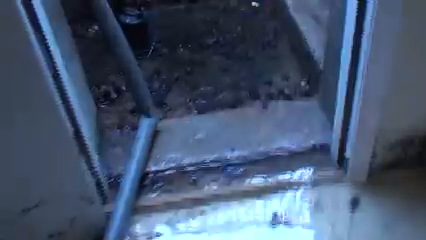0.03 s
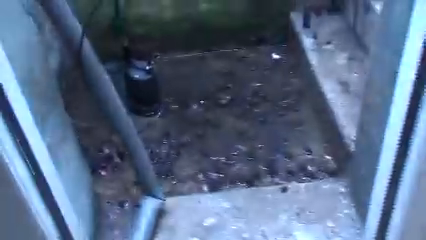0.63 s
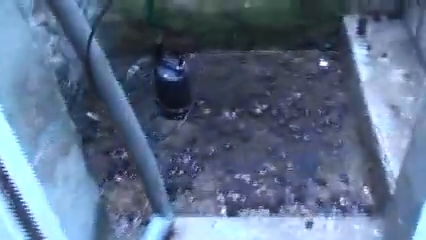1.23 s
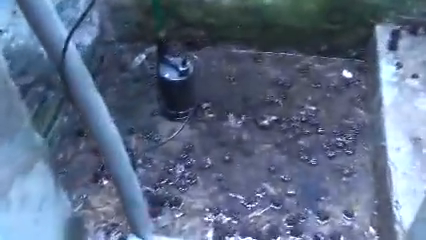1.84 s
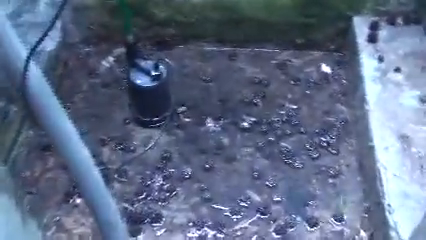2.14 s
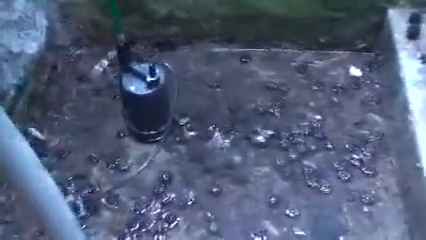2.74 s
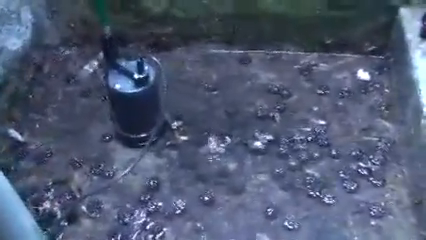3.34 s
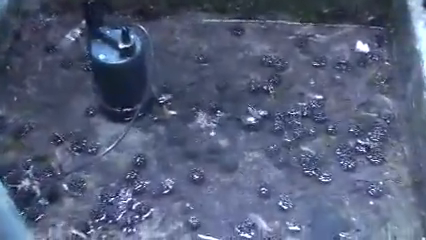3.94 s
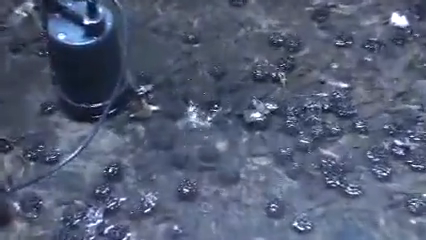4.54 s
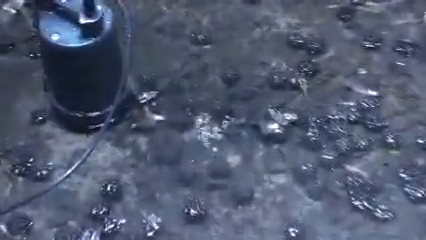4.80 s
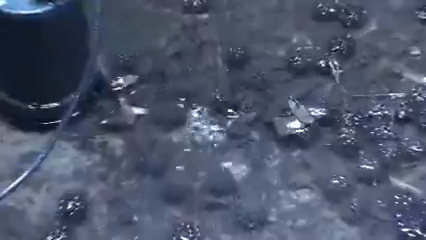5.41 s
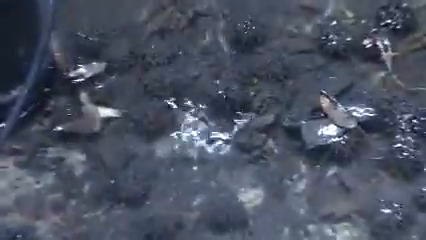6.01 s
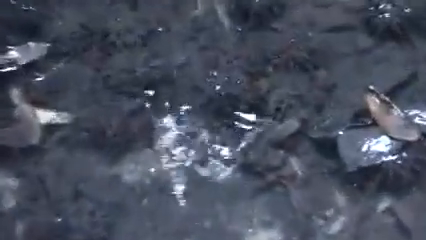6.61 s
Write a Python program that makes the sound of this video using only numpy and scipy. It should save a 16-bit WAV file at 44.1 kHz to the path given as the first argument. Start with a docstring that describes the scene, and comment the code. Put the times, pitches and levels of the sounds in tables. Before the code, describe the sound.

Water gurgles and splashes in uneven surges from a backed-up drain, over trickling and a low pump hum.

```python
"""A backed-up basement drain

Water wells up in uneven surges at a drain in a flooded concrete well. Each surge frees bubbles that
gulp and gurgle, and throws droplets and spray. Hard walls echo; water trickles and plops in between.
A pump hums and rumbles under the water, louder as the listener comes through the doorway."""
import sys
import numpy as np
from scipy import signal
from scipy.fft import rfft, irfft, next_fast_len
from scipy.io import wavfile
from scipy.ndimage import map_coordinates

SR = 44100
rng = np.random.default_rng(int(sys.argv[2]) if len(sys.argv) > 2 else 0)


def unload_audio(sound):
    """Save the sound as a 16-bit wav file, at the path given as the first command line argument."""
    columns = np.transpose(np.atleast_2d(sound))
    # keep every value between -1 and 1, then stretch to whole-number steps
    steps = np.round(np.clip(columns, -1, 1) * 32767)
    wavfile.write(sys.argv[1], SR, steps.astype(np.int16))


N = 293706


def amp(db):
    """Turn decibels into a gain."""
    return 10 ** (np.asarray(db) / 20)

def unit(x):
    """Scale a sound to an average power of 1."""
    return x / np.sqrt(np.mean(x ** 2) + 1e-20)

def add(out, start_s, sound):
    """Mix a sound into a track."""
    part = out[int(start_s * SR):][:len(sound)]
    part += sound[:len(part)]

def along(table, hz):
    """Read between the rows of a table of frequencies and values."""
    freqs, values = np.transpose(table)
    return np.interp(np.log(hz + 1), np.log(freqs), values)

def wobble(rate):
    """A smooth random curve through `rate` points a second."""
    return map_coordinates(rng.standard_normal(int(N * rate / SR) + 4), [np.arange(N) * rate / SR])

def filtered(x, response):
    """Give each frequency the gain response(hz)."""
    size = x.shape[-1]
    padded = next_fast_len(size + 4096)
    return irfft(rfft(x, padded) * response(np.fft.rfftfreq(padded, 1 / SR)), padded)[..., :size]

def coloured(x, tone):
    """Shape the lows and highs with a tone table, at power 1."""
    return unit(filtered(x, lambda hz: amp(along(tone, hz))))

def swell(t, rise_s, hold_s, fade_s):
    """Build up, stay until time hold_s, then drop 60 dB every fade_s."""
    return np.clip(t / max(rise_s, .003), 0, 1) * amp(-60 * np.maximum(t - hold_s, 0) / fade_s)

def bubbles(size, rate, hz, spread, cycles, scatter_db, glide=0.093):
    """Bubbles, `rate` a second: each rings, fades over `cycles` and rises in pitch near the surface."""
    chance = rng.random((max(int(rate * size / SR), 4), 4))
    start = (chance[:, 0] * size).astype(int)
    pitch = np.broadcast_to(hz, size)[start, None] * np.exp(spread * (2 * chance[:, 1:2] - 1))
    strength = amp(-scatter_db * np.log(1 - .97 * chance[:, 2:3]))
    samples = np.arange(int(min(4 * cycles / np.min(hz), .06) * SR) + 8)
    turns = pitch * samples / SR
    age = turns / cycles
    tone = np.sin(2 * np.pi * turns * (1 + glide * age / 2)) * np.exp(-age) * np.sqrt(pitch)
    tone *= strength * np.sign(chance[:, 3:] - .5)
    return unit(np.bincount((start[:, None] + samples).ravel(), tone.ravel(), size)[:size])


# How long the concrete echoes: frequency_hz, fade_s
ECHO_FADES = [(150, 0.45), (500, 0.72), (1100, 0.93), (1550, 0.86), (2200, 1), (4000, 0.75), (11000, 0.51)]

def walls(x):
    """Hard walls give a blurred echo; each frequency dies at its own speed."""
    hz, t, noise = signal.stft(rng.standard_normal(SR), SR, nperseg=256)
    tail = signal.istft(noise * amp(-60 * t / along(ECHO_FADES, hz)[:, None]), SR, nperseg=256)[1]
    return signal.fftconvolve(x, np.pad(tail / np.linalg.norm(tail), (SR // 150, 0)))[:N]


# Stereo width by frequency: frequency_hz, level_db
STEREO_WIDTH = [(50, -18), (130, -20), (300, -11.5), (1200, -7), (2200, -7), (3600, -13), (4400, -70)]
# How much louder the left is than the right: frequency_hz, level_db
LEFT_BOOST = [(40, .5), (200, 1.6), (1000, 1.2), (2200, 1), (4000, 0)]

def stereo(x, fade_s=0.16):
    """Left and right differ mostly at middle pitches; the treble is the same in both."""
    t = np.arange(SR // 4) / SR
    blur = rng.standard_normal(len(t)) * amp(-60 * t / fade_s) * (t > .004)
    side = signal.fftconvolve(x, blur / np.linalg.norm(blur))[:N]
    side = filtered(side, lambda hz: amp(along(STEREO_WIDTH, hz)))
    pair = np.array([x + side, x - side])
    return filtered(pair, lambda hz: amp(np.outer([.5, -.5], along(LEFT_BOOST, hz))))


# The way in through the doorway: time_s, nearness
WALK = [(1.2, 0.14), (3.0, 0.77), (6.4, 0.98)]

def nearness():
    """How close the listener is, from 0 (outside) to 1 (at the drain)."""
    return np.interp(np.arange(N) / SR, *np.transpose(WALK))


# The pump's low rumble: frequency_hz, level_db
RUMBLE_TONE = [(15, -54), (25, -37), (36, -13), (52, 4), (68, 5), (90, -9), (135, 2), (170, -1), (300, -30)]

def pump(shaft_hz=57.65, whine_hz=410):
    """The motor hums at two and three times its shaft speed, with a faint whine and a rumble."""
    near = nearness()
    hum_db, rumble_db = -63 + 21 * near, -63.5 + 17.5 * near
    shaft = 2 * np.pi * np.cumsum(shaft_hz + 0.23 * wobble(7.1)) / SR
    hum = amp(hum_db + 0.89 * wobble(9))
    hum *= unit(np.sin(2 * shaft) + amp(-7 + 2.8 * wobble(12)) * np.sin(3 * shaft))
    whine = amp(hum_db - 8.5 + 3 * wobble(2.8))
    whine *= unit(np.sin(2 * np.pi * np.cumsum(whine_hz + 5 * wobble(25)) / SR))
    return hum + whine + amp(rumble_db) * coloured(rng.standard_normal(N), RUMBLE_TONE)


# The wash of running water and its fizz: frequency_hz, level_db
WASH_TONE = [(90, -20), (180, 0.5), (420, 2), (850, -1), (1350, 2.5), (2100, -3.5), (2600, -2.5),
             (3400, -8), (6500, -10), (12000, -23)]
FIZZ_TONE = [(2000, -23), (3500, -8.5), (5000, -3), (7300, -0.5), (9500, -4), (11500, -2.5), (12300, -5)]

def trickle():
    """Water keeps running: bubbles on a soft wash, and a fizz that grows as the listener nears."""
    near = nearness()
    flow = amp(0.26 * wobble(4.5))
    babble = bubbles(N, rate=260, hz=793, spread=1.2, cycles=6.4, scatter_db=5.5, glide=0.037)
    wash = coloured(rng.standard_normal(N), WASH_TONE) * amp(1.75 * wobble(14))
    stream = amp(-37.5 + 1.27 * near) * (wash + amp(-9) * babble)
    fizz = bubbles(N, rate=7000, hz=6500, spread=0.68, cycles=1.06, scatter_db=0)
    return flow * (stream + amp(-48.5 + 7 * near ** 2) * coloured(fizz, FIZZ_TONE))


# The notes of one hollow knock: pitch_hz, level_db, fade_s
KNOCK_NOTES = [(215, -21.5, 0.12), (2136, -21, 0.091)]

def knock(start_s=.268):
    """A hollow knock rings briefly under a bright, splashy clash."""
    out, t = np.zeros(N), np.arange(SR // 3) / SR
    onset = 1 - np.exp(-t / 0.0065)
    for hz, db, fade_s in KNOCK_NOTES:
        add(out, start_s, amp(db - 60 * t / fade_s) * onset * np.sin(2 * np.pi * hz * t))
    clash = bubbles(len(t), rate=1600, hz=7030, spread=0.13, cycles=40, scatter_db=5, glide=.003)
    crack = bubbles(len(t), rate=6000, hz=3850, spread=0.88, cycles=2.5, scatter_db=1.5)
    add(out, start_s, amp(-27.5) * swell(t, .004, 0.024, fade_s=0.24) * clash)
    add(out, start_s, amp(-27) * swell(t, 0.0038, 0.025, fade_s=0.19) * crack)
    return out


# The loudest plops: start_s, level_db, pitch_hz, splat_db (added to level_db)
WATER_PLOPS = [(0.8, -25, 2490, -11), (1.434, -21.5, 733, -10), (1.553, -27.5, 530, -11),
               (1.826, -20, 1325, -14), (2.22, -26, 2730, -3), (3.128, -21, 1486, -23),
               (3.224, -26.5, 676, -36), (3.477, -35.5, 1360, 3), (4.391, -26, 506, -3.5),
               (4.737, -26.5, 1213, -8.5), (5.405, -27, 2520, 1.5), (5.431, -21.5, 1265, -14),
               (5.614, -27.5, 2500, -1.5)]

def plops():
    """Lumps of water slap the surface, each ringing one bubble; small drips fall at random."""
    out, t = np.zeros(N), np.arange(SR // 8) / SR
    for start_s, db, hz, splat_db in WATER_PLOPS:
        ring = np.sin(2 * np.pi * hz * t * (1 + 1.2 * t))
        ring *= amp(-60 * t / 0.052) * np.minimum(t / 0.0016, 1)
        splat = bubbles(len(t), rate=2500, hz=1725, spread=0.77, cycles=2.34, scatter_db=2)
        splat *= swell(t, 0.0062, 0.0078, fade_s=0.06)
        add(out, start_s, amp(db) * (ring + amp(splat_db + 2) * splat))
    drips = bubbles(N, rate=30, hz=1464, spread=0.85, cycles=3.7, scatter_db=1.5, glide=0.018)
    return out + amp(-47.5) * drips


# Surges of air and water, which drive splash, bubble_notes and gurgle:
# start_s, rise_s, hold_s, gurgle_db, gulp_db, spray_db
DRAIN_SURGES = [(0.131, 0.017, 0.021, -34.5, -38, -39), (0.411, 0.013, 0.025, -38, -33.5, -49),
                (0.655, 0.015, 0.28, -44.5, -40.5, -46.5), (0.823, 0.024, 0.1, -27.5, -31, -41.5),
                (0.966, 0.013, .055, -37.5, -41, -40), (1.351, 0.018, .064, -47, -49, -52),
                (1.619, 0.0075, 0.063, -29.5, -31.5, -37.5), (1.777, 0.048, 0.21, -35, -38, -40.5),
                (1.95, 0.018, 0.098, -26, -30.5, -33), (2.617, 0.038, 0.093, -44, -40, -47.5),
                (2.718, 0.01, 0.073, -29, -37, -39.5), (2.989, 0.012, 0.098, -28.5, -37.5, -44),
                (3.368, 0.024, .09, -46, -40, -57), (3.563, 0.023, 0.097, -25, -32.5, -34),
                (4.137, 0.0087, 0.1, -25.5, -30, -40.5), (4.911, .012, 0.077, -24, -30.5, -35.5),
                (5.347, .014, 0.04, -38, -34, -41.5), (5.874, 0.021, 0.081, -20, -31, -26.5),
                (6.237, 0.014, 0.055, -40, -43, -42), (6.348, 0.0073, 0.06, -28.5, -31.5, -32.5),
                (6.398, 0.026, 0.071, -23.5, -31, -29.5)]
USUAL_GURGLE_DB, USUAL_SPRAY_DB, USUAL_RISE_S = -27, -36, .015  # an ordinary surge
# The three parts of a splash: frequency_hz, level_db
GULP_TONE = [(25, -60), (90, -31), (170, -13.5), (300, -4), (420, -1), (620, 1.5), (770, 3.5), (900, -11.5),
             (1500, -38)]
DROP_TONE = [(1000, -36), (2000, 4), (2500, -1), (3200, -2.5), (4300, -1.5), (6000, -25)]
SPRAY_TONE = [(2500, -20), (4000, -5.5), (4700, -1), (6200, -3), (7600, -3), (9200, -7.5), (12000, -9.5)]

def splash(spray_lag_s=0.0023):
    """Surges push out deep gulps of air, droplets and spray; a softer backwash follows as water falls."""
    gulp_power, drop_power, spray_power = np.zeros((3, N))
    t = np.arange(SR) / SR
    backwash = amp(-17.5) * swell(t - 0.19, rise_s=0.099, hold_s=0.24, fade_s=0.45)
    for start_s, rise_s, hold_s, _, gulp_db, spray_db in DRAIN_SURGES:
        push = swell(t, rise_s, hold_s, fade_s=0.39)
        burst = swell(t, rise_s + spray_lag_s, hold_s, fade_s=0.44)
        drop_db = -35.8 + .65 * (spray_db - USUAL_SPRAY_DB)
        add(gulp_power, start_s, (amp(gulp_db + 0.1) * (push + backwash)) ** 2)
        add(drop_power, start_s, (amp(drop_db) * (burst + backwash)) ** 2)
        add(spray_power, start_s, (amp(spray_db + 1.72) * (burst + amp(-4) * backwash)) ** 2)
    gulps = bubbles(N, rate=700, hz=402.7, spread=0.89, cycles=3.67, scatter_db=1)
    drops = bubbles(N, rate=1900, hz=3160, spread=0.534, cycles=2.3, scatter_db=6.5)
    spray = bubbles(N, rate=5000, hz=7310, spread=0.563, cycles=2.95, scatter_db=3)
    return (np.sqrt(gulp_power) * coloured(gulps, GULP_TONE)
            + np.sqrt(drop_power) * coloured(drops, DROP_TONE)
            + np.sqrt(spray_power) * coloured(spray, SPRAY_TONE))

def bubble_note(rise_s, hold_s, hz, spread):
    """A steady neck of air pinches off bubbles of like size, so they ring near one pitch."""
    t = np.arange(SR // 4) / SR
    ring = bubbles(len(t), rate=500, hz=hz, spread=spread, cycles=hz * 0.0092, scatter_db=1, glide=.0012)
    return swell(t, rise_s, hold_s, fade_s=0.14) * ring


# The notes in every surge:
# delay_s, hold_s, pitch_hz, pitch_spread, level_db, db_per_gurgle_db, db_per_doubled_rise
SURGE_NOTES = [(.004, 0.029, 1110, .05, -29.5, 0.72, -3), (.025, 0.082, 365, .25, -43, 0.74, -4.5),
               (.06, .09, 1520, .06, -37.5, 1.52, 3), (.02, 0.078, 4830, .055, -47, 0.3, -4.5)]
# Notes with their own timing: start_s, hold_s, pitch_hz, pitch_spread, level_db
STRAY_NOTES = [(0.7, .033, 4060, .1, -36.5), (0.824, .06, 7230, .09, -40), (0.983, 0.029, 663, 0.08, -29),
               (1.436, 0.0084, 2700, 0.27, -34), (2.097, .04, 2510, 0.54, -30.5),
               (3.391, .03, 3556, 0, -37), (3.43, 0.041, 2500, 0.15, -40.5),
               (4.905, 0.03, 3530, 0.02, -35.5), (6.42, 0.032, 8100, 0.05, -33)]

def bubble_notes():
    """Each surge rings an opening note, a glug, a thin sizzle and a higher note; a few notes stray."""
    out = np.zeros(N)
    for start_s, rise_s, _, gurgle_db, _, _ in DRAIN_SURGES:
        # A sudden start favours the opening note, a hard surge the higher note.
        harder_db, slowness = gurgle_db - USUAL_GURGLE_DB, np.log2(rise_s / USUAL_RISE_S)
        for delay_s, hold_s, hz, spread, db, by_strength, by_rise in SURGE_NOTES:
            note_db = db + by_strength * harder_db + by_rise * slowness
            add(out, start_s + delay_s, amp(note_db) * bubble_note(0.64 * rise_s, hold_s, hz, spread))
    for start_s, hold_s, hz, spread, db in STRAY_NOTES:
        add(out, start_s, amp(db) * bubble_note(0.0026, hold_s, hz, spread))
    return out


# The pipe's own notes: pitch_hz, width_hz, level_db
PIPE_NOTES = [(815, 33, -6), (1066, 9.7, -8), (1265, 86, -2.5), (1362, 55, 0.5), (1530, 36, -3),
              (1790, 21, -15)]

def drain_pipe(x):
    """The air in the drain pipe rings on after every bubble."""
    return filtered(x, lambda hz: sum(
        amp(db) * 1j * hz * width / (pitch ** 2 - hz ** 2 + 1j * hz * width)
        for pitch, width, db in PIPE_NOTES))


# Bubbling at the pipe's mouth: frequency_hz, level_db
GURGLE_TONE = [(400, -35), (850, 1), (1080, -1.5), (1500, -3), (1850, 1), (2200, -10.5), (3000, -12),
               (6000, -50)]

def gurgle(climb=0.24, settle_s=0.072):
    """Each surge frees a cloud of bubbles: large ones first, then smaller, higher ones."""
    mouth, pipe = np.zeros((2, N))
    t = np.arange(SR * 2 // 3) / SR
    for start_s, rise_s, hold_s, db, _, _ in DRAIN_SURGES:
        base_hz = 1134 + 32 * start_s + 8.5 * (db - USUAL_GURGLE_DB)  # later or harder rings higher
        pitch = base_hz * (1 + climb * (.6 - np.exp(-t / settle_s)))
        cloud = bubbles(len(t), rate=800, hz=pitch, spread=0.299, cycles=8.1, scatter_db=5, glide=0.028)
        churn = bubbles(len(t), rate=1800, hz=1590, spread=0.54, cycles=3.24, scatter_db=2)
        bubbling = coloured(cloud + churn, GURGLE_TONE)
        add(mouth, start_s, amp(db) * swell(t, rise_s, hold_s, fade_s=0.2) * bubbling)
        # Small late bubbles keep rising in the pipe after the surge.
        late = bubbles(len(t), rate=360, hz=1435, spread=0.24, cycles=9.3, scatter_db=0, glide=0.018)
        add(pipe, start_s, amp(db - 10.5) * swell(t, hold_s, hold_s, fade_s=1.8) * late)
    return amp(-1.5) * mouth + amp(-2.8) * drain_pipe(mouth + pipe)

def scene():
    """Water in its concrete well, with the pump standing in it."""
    water = gurgle() + bubble_notes() + splash() + plops() + knock()
    return stereo(water + amp(-3.5) * walls(water) + trickle() + pump())

def record(dry, start_s=0.136, top_hz=12200):
    """The sound opens after a short silence, with its highest treble cut off."""
    opening = np.clip((np.arange(N) / SR - start_s) / 0.0034, 0, 1)
    return filtered(dry * opening, lambda hz: np.clip((top_hz - hz) / 500 + .5, 0, 1) ** 2)


dry = scene()
out = record(dry)
unload_audio(out)
```